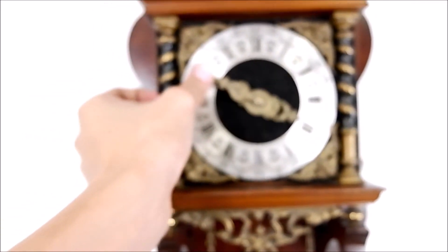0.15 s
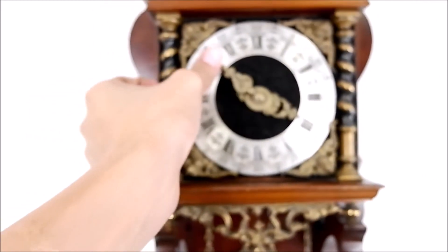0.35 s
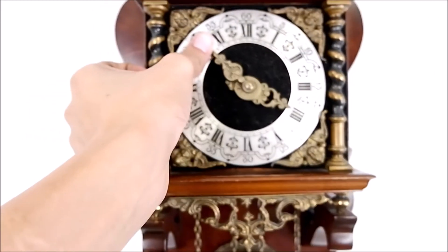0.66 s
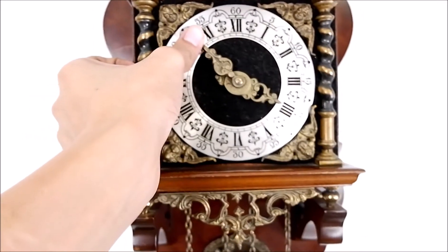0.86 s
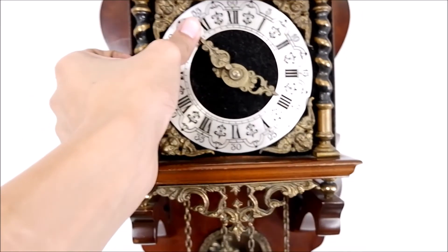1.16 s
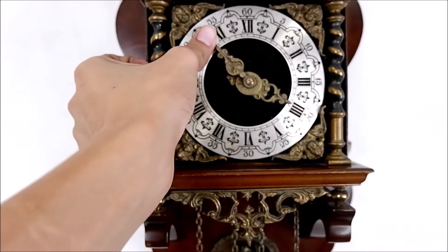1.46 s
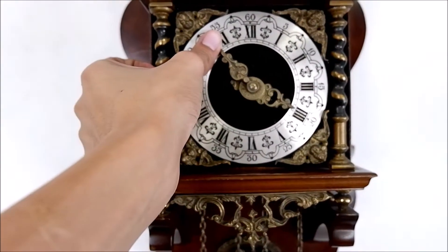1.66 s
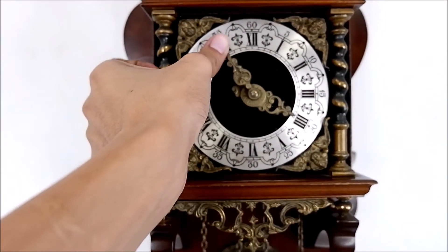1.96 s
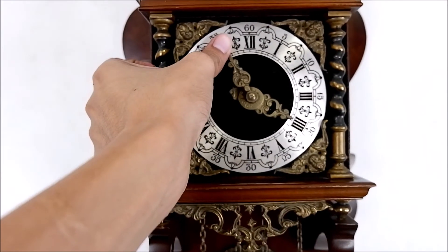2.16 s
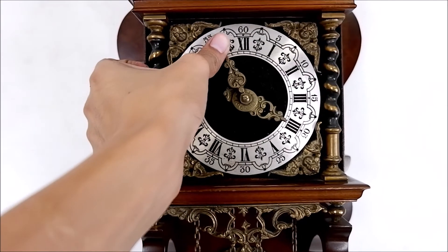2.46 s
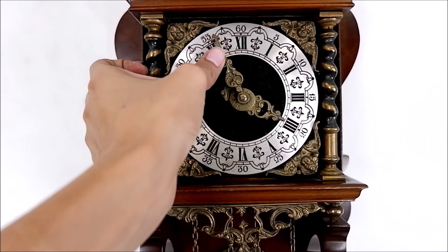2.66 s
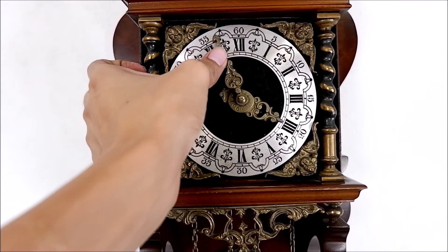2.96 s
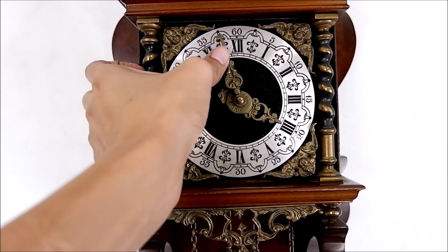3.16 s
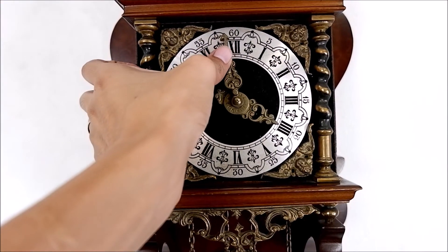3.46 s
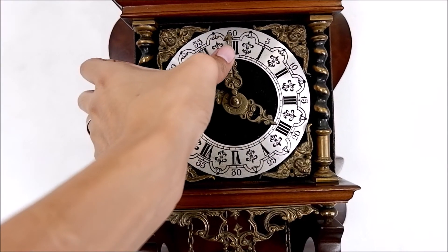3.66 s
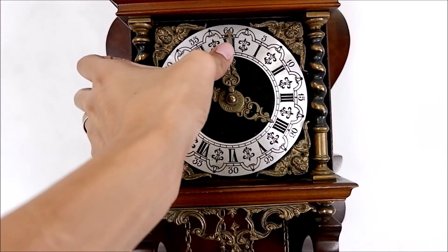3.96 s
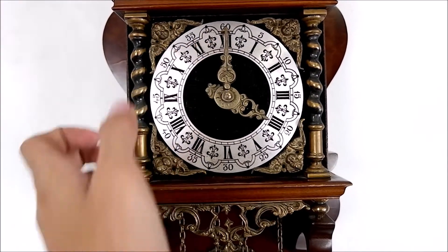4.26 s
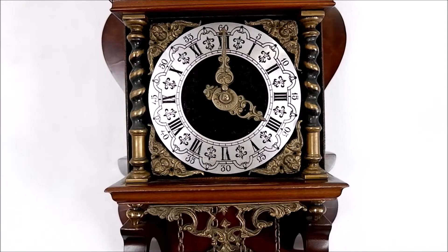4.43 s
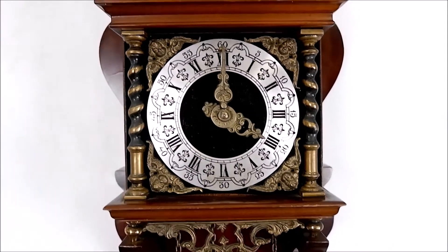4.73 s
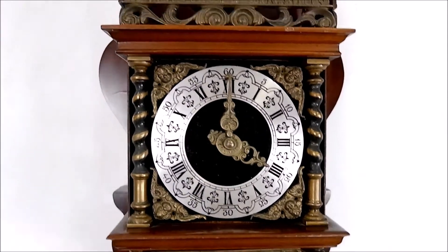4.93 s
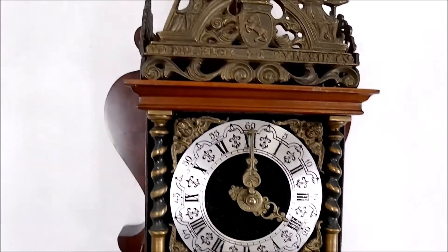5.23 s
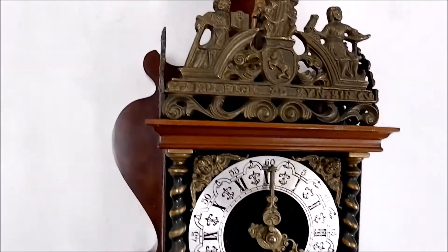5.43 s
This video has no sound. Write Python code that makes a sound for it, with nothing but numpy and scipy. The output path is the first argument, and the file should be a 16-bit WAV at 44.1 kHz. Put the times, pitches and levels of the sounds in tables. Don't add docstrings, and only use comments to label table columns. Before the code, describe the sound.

Close on the microphone, hard plastic snaps and small creaks of fingers gripping the phone fill the first second or so. A wooden clock ticks about twice a second, with faint knocks and scrapes as its hand is pushed. Near four seconds a lever drops, bounces and clinks; then ticks weaken and gears whirr softly. Quiet small room with low hum.

```python
import sys
import numpy as np
from scipy import signal
from scipy.fft import rfft, irfft
from scipy.io import wavfile
from scipy.ndimage import uniform_filter1d

SR = 44100
rng = np.random.default_rng(int(sys.argv[2]) if len(sys.argv) > 2 else 0)


def digitize_waveform(pressure):
    field = np.atleast_2d(pressure).T
    bounded = np.clip(field, -1, 1)
    quanta = np.round(bounded * 32767).astype(np.int16)
    wavfile.write(sys.argv[1], SR, quanta)


def undo_db(level):
    steps = np.asarray(level, float) / 20
    return 10 ** steps


N = 246519
T = np.arange(N) / SR
HZ = np.maximum(np.fft.rfftfreq(N, 1 / SR), 1)

# (frequency [Hz], density [dB per Hz])
AIR_MID = [(25, -36.5), (55, -10.5), (110, -7.5), (200, -3), (290, -7), (430, -9.5), (1000, -13),
           (2500, -16.5), (3500, -19), (4200, -18.5), (5500, -20), (8000, -25), (12000, -28), (15500, -27)]
# (frequency [Hz], side minus mid [dB])
AIR_SIDE = [(60, -5.5), (110, -7), (200, -5), (380, -3.5), (700, -3.5), (1290, -2), (2380, -1.5),
            (4400, 0.5), (8120, -1), (15000, 0)]
# (centre [Hz], width [Hz], level [dB])
HUM = [
    (65, 21, -71),
    (286.2, 33, -65),
    (465, 20, -77.5),
    (1288, 35, -79),
    (4110, 840, -70.5),
]
# (time [s], gain change [dB], recovery [s])
GAIN_MOVES = [
    (.108, -8, 0.31),
    (.712, -13, 0.18),
    (.883, -6.5, 0.56),
    (1.121, -5.5, 0.43),
    (3.885, 2.5, 0.11),
]
# (frequency [Hz], left minus right [dB])
PORT_DB = [(60, 0), (500, 0), (750, -6), (1200, 0), (2800, 0), (3300, -3), (4200, 2), (5200, -5),
           (8000, -5), (16000, -3)]
# (frequency [Hz], left phase lead [rad])
PORT_RAD = [(60, 0), (3700, -.4), (4200, 1.8), (4700, 1.2), (5200, -.4), (6100, 2.5), (6700, 2.1),
            (8500, 2.1), (10000, 2.5), (12500, .3), (16000, 2)]
# (time [s], level [dB], centre [Hz], length [ms])
SHIFTS = [(.01, -56, 1510, 32), (0.054, -49, 393, 3.7), (.32, -54, 2600, 52), (.37, -56, 2370, 55),
          (0.417, -53.5, 2090, 40), (.5, -56.5, 2500, 420), (0.594, -52, 1440, 31), (.65, -57, 242, 10),
          (.725, -50, 1820, 15), (0.886, -48, 146, 7), (.89, -55.5, 1860, 25), (1.121, -53, 204, 8.3),
          (1.127, -58, 2280, 9.4), (.114, -54, 2600, 10), (.14, -62.5, 2400, 70), (.33, -62, 2300, 130)]
# (time [s], level [dB], length [ms])
CREAKS = [
    (0.631, -43, 26),
    (.645, -39.5, 16.4),
    (0.689, -42, 15),
    (.793, -40, 14),
    (0.919, -44, 12),
    (1.078, -49.5, 12),
]
# (centre [Hz], width [octaves], level [dB])
CREAK_BANDS = [
    (2400, 1.2, -8.5),
    (4400, 0.31, -8),
    (7650, .5, -7),
    (12000, 1.2, -15.5),
]
# (time [s], knock level [dB], knock [Hz], crackle level [dB], crackle length [ms])
SNAPS = [(0.098, -27, 2400, -36, 4.4), (0.1027, -29, 2210, -19, 2.9), (0.1072, -10, 2770, -4.5, 3),
         (0.1087, -19, 1850, -21.5, 7.1), (0.1111, -20, 2900, -29, 4.2), (0.711, -5, 2430, 0.5, 0.41),
         (0.7121, -19.5, 1440, -20, 9.7), (0.7159, -24, 2240, -8.5, 7.2), (0.8758, -25.5, 2010, -24, 21),
         (0.883, -17.5, 4530, -22, 1.6), (.8832, -18, 1870, -18, 2.1), (0.882, -20, 1467, -6, 4.7),
         (1.1115, -33, 2800, -40, 11), (1.1185, -24, 1950, -31.5, 2.3), (1.1211, -12, 1730, -6.5, 1.6),
         (1.121, -7, 2755, -19.5, 3.6), (1.1225, -23, 1800, -9.5, 2.5), (1.1254, -18.5, 2900, -23.5, 4.6),
         (1.349, -50, 2200, -36.5, 3.7)]
# (frequency [Hz], density [dB per Hz])
SHELL = [(150, -25), (550, -28.5), (870, -20), (1460, -9), (1900, -4.5), (2700, -7.5), (3700, -19),
         (4400, -0.5), (4850, -7), (5150, -6.5), (6100, -15.5), (7300, -4.5), (8400, -8.5), (12000, -27.5),
         (16500, -43)]
# (time [s], level [dB], centre [Hz], length [ms])
KNOCKS = [
    (2.143, -45, 1210, 13),
    (2.153, -45.5, 746, 22),
    (2.365, -54.5, 990, 21),
    (3.098, -49, 1300, 14),
    (3.1, -46.5, 430, 27),
    (3.139, -59, 1180, 40),
    (4.399, -53, 880, 14),
    (4.73, -52.5, 1170, 52),
    (5.447, -54, 270, 7.8),
]
# (time [s], level [dB], centre [Hz], length [ms])
SCRAPES = [(1.471, -51, 1800, 22), (2.528, -53.5, 1100, 9.6), (2.98, -59, 1400, 39),
           (2.152, -49.5, 3520, 9), (2.0, -54, 900, 17), (2.945, -56, 930, 11), (3.1, -54, 2480, 6.1),
           (3.15, -60, 470, 30), (3.31, -59.5, 2000, 15), (3.55, -58, 1500, 14), (3.71, -58, 2700, 15),
           (4.14, -58, 1800, 25), (4.285, -58, 2420, 17), (5.33, -52, 2220, 33), (5.45, -56.5, 2260, 17)]
# (frequency [Hz], level [dB], T60 [s])
CASE = [(1283.6, 8.5, 0.082), (1397, -7.5, 0.15), (2090, -7.5, 0.045), (2366, -9, 0.085),
        (2557, -8.5, 0.064), (2658, 2.5, 0.038), (2900, -21, 0.022), (3210, -27, 0.0087), (3920, -18, .02),
        (1800, -17, .03)]
# (time [s], peak [dB], upper modes [dB])
TICKS = [(0.0762, -42, 4.5), (0.5445, -37.5, -0.5), (1.035, -41, -3.5), (1.505, -39, -5.5),
         (1.986, -39.5, 1.5), (2.4507, -38, 0), (2.9427, -36, -0.5), (3.139, -49, 2), (3.41, -37, -2.5),
         (3.886, -31, -6), (4.3749, -43, -2), (4.8549, -44.5, 3), (4.878, -50, -10), (5.3138, -49, 0)]
# (time [s], first bounce [dB], bouncing lasts [s])
DROPS = [
    (3.8812, -24, 0.032),
    (3.935, -32.5, .056),
]
# (frequency [Hz], level [dB], T60 [s])
FRAME = [(470, -9.5, 0.22), (644, -5.5, 0.17), (722.4, -7, 0.15), (870, 0, .07), (994, -1.5, 0.058),
         (1076, -0.5, 0.086), (1290, -5.5, 0.096), (1470, 5, 0.028), (1688, -3.5, 0.079),
         (2140, 2.5, 0.038), (2420, 6, 0.024), (2600, -9, 0.026), (2930, -6, 0.1)]
# (time [s], peak [dB])
CLINKS = [(3.882, -38), (3.89, -29), (3.897, -35), (3.903, -38), (3.914, -43), (3.925, -40), (3.936, -34.5),
          (3.941, -41), (3.959, -40), (3.966, -43), (3.95, -40), (3.98, -46)]
# (frequency [Hz], level [dB], T60 [s])
STEEL = [(4000, -4, .03), (4600, -6, .03), (5400, -2, .03), (6200, 0, .035), (6900, -3, .035),
         (7300, -4, .035), (8100, -2, .035), (8600, -2, .035)]

AIR_TOP_HZ, HUSH_DB, BASS_DB = 15900, -62.5, 3.5
ROOM_T60_S, ROOM_DB = 0.1, -24.5
SHIFT_OCT, KNOCK_OCT, SCRAPE_OCT = 0.83, 1.9, 0.93
SNAP_TOP_HZ, KNOCK_T60_S = 16600, 0.0065
TILT_DB_PER_OCT, TILT_PER_DB = 6, 0.66
TRAIN_S, TRAIN_RUN_UP_S, TRAIN_DB, TRAIN_DB_PER_S = 4.54, 0.35, -64, 3.5
TICK_PUSH_MS, TICK_RISE_S = 5.8, 0.005
LOCK_S, LOCK_DB = 0.017, -8
BOUNCE_S, BOUNCE_GROWTH, BOUNCE_FADE_DB_PER_S = 0.0045, 1.16, -170
CONTACT_MS, FIRST_CONTACT_MS = 4.3, 1.7
CEILING = 0.62


def along_hz(table):
    f, v = np.transpose(table)
    return np.interp(np.log(HZ), np.log(np.maximum(f, 1)), v)


def shaped(x, gain):
    return irfft(rfft(x) * gain, N)


def unit(x):
    return x / np.sqrt(np.mean(x ** 2))


def add(out, s, x, db):
    i = max(int(s * SR), 0)
    x = x[:N - i]
    out[i:i + len(x)] += x * undo_db(db) / np.max(np.abs(x))


def decay(t, t60):
    return np.exp(-np.log(1000) * t / t60)


def walk(rate_hz):
    band = np.exp(-(HZ / rate_hz) ** 2) * (HZ > 1.1 * SR / N)
    return unit(shaped(rng.standard_normal(N), band))


def gain_db():
    total = np.zeros(N)
    for s, db, recovery_s in GAIN_MOVES:
        attack = np.clip((T - s) / 0.0028 + 1, 0, 1)
        total += db * attack * np.exp(-(np.maximum(T - s, 0) / recovery_s) ** 2.15)
    return total


def hush():
    mid_gain = undo_db(along_hz(AIR_MID)) * (HZ < AIR_TOP_HZ)
    mid = shaped(rng.standard_normal(N), mid_gain)
    side = shaped(rng.standard_normal(N), mid_gain * undo_db(along_hz(AIR_SIDE)))
    hiss_band = (HZ > 3500) & (HZ < 12000)
    air = np.array([mid + side, mid - side]) / np.sqrt(np.mean(shaped(mid, hiss_band) ** 2))
    low = shaped(air, 1 / (1 + (HZ / 900) ** 2))
    drone = np.zeros(N)
    for f, width, db in HUM:
        resonance = 1 / (1 + (2 * (HZ - f) / width) ** 2)
        drone += undo_db(db + 61) * unit(shaped(rng.standard_normal(N), resonance))
    swell = undo_db(BASS_DB + 0.8 * walk(6))
    return undo_db(HUSH_DB + gain_db()) * (air - low + swell * (low + drone))


def rubs(rows, octaves):
    out, t = np.zeros(N), np.arange(4096) / SR
    f = np.maximum(np.fft.rfftfreq(4096, 1 / SR), 1)
    for s, db, hz, ms in rows:
        grit = rng.standard_normal(4096) * undo_db(3.66 * rng.exponential(size=4096))
        grit = irfft(rfft(grit) * np.exp(-2 * (np.log2(f / hz) / octaves) ** 2))
        envelope = (1 - np.exp(-t / 0.003)) * np.exp(-(t * 1000 / ms) ** 2)
        add(out, s, grit * envelope, db + 11)
    return out


def creaks():
    out = np.zeros(N)
    for hz, octaves, band_db in CREAK_BANDS:
        out += rubs([(s, db + band_db, hz, ms) for s, db, ms in CREAKS], octaves)
    return out


def snaps():
    out, t = np.zeros(N), np.arange(1024) / SR - 0.002
    f = np.maximum(np.fft.rfftfreq(1024, 1 / SR), 1)
    shell_hz, shell_db = np.transpose(SHELL)
    colour = np.interp(np.log(f), np.log(shell_hz), shell_db)
    treble = 1 / (1 + (3600 / f) ** 8)
    highpass = signal.butter(2, 900, "high", fs=SR, output="sos")
    for s, knock_db, hz, crackle_db, ms in SNAPS:
        knock = np.sin(2 * np.pi * hz * t) * decay(t, KNOCK_T60_S) * np.clip(t * hz, 0, 1)
        add(out, s + t[0], signal.sosfilt(highpass, knock), knock_db)

        fade = np.exp(-t * 2300 / ms) * (t > 0)
        grit = rng.standard_normal(1024) * fade
        parts = rfft(grit) * (1 - treble) + rfft(grit * fade ** 1.25) * treble
        parts /= np.sqrt(uniform_filter1d(np.abs(parts) ** 2, size=15))
        tilt = TILT_DB_PER_OCT + TILT_PER_DB * crackle_db
        colour_gain = undo_db(colour + tilt * np.log2(np.maximum(f / 2500, 1)))
        crackle = irfft(parts * (f > 100) * (f < SNAP_TOP_HZ) * colour_gain)
        gate = np.exp(-(t * 1000 / (1.15 * ms + 1.3)) ** 4)
        add(out, s + t[0], gate * crackle, crackle_db)
    return out


def train():
    teeth = rng.standard_normal(N) * undo_db(2.5 * rng.exponential(size=N) + 2.5 * walk(12))
    modes = sum(undo_db(db) / np.sqrt(1 + (HZ - f) ** 2 * t60 ** 2) for f, db, t60 in CASE)
    broad = undo_db(-4) * np.exp(-2 * (np.log2(HZ / 1500) / 1.6) ** 2)
    run_up = np.clip((T - TRAIN_S) / TRAIN_RUN_UP_S, 0, 1)
    return unit(shaped(teeth, modes + broad)) * run_up * undo_db(TRAIN_DB + TRAIN_DB_PER_S * (T - TRAIN_S))


def ring(modes, length_ms, scatter_db, rattle_db, size=8192):
    t = np.arange(size) / SR
    push = rng.standard_normal(size) * t * np.exp(-t * 5000 / max(length_ms, 0.2))
    push /= np.sqrt(np.sum(push ** 2))
    f, db, t60 = np.transpose(modes)[:, :, None]
    level_chance, pitch_chance = rng.standard_normal((2, len(modes), 1))
    f = f * (1 + 0.003 * pitch_chance)
    reach = np.abs(np.exp(2j * np.pi * f * t[:1024]) @ push[:1024])
    reach = np.maximum(reach, 0.3)[:, None]
    body = undo_db(db + scatter_db * level_chance) / reach * decay(t, t60) * np.sin(2 * np.pi * f * t)
    rattle = undo_db(rattle_db) * rng.standard_normal(size) * decay(t, np.median(t60))
    band = signal.butter(4, [0.85 * f.min(), 1.1 * f.max()], "band", fs=SR, output="sos")
    return signal.sosfilt(band, signal.fftconvolve(push, body.sum(axis=0) + rattle)[:size])


def ticks():
    out, rise = np.zeros(N), 1 - np.exp(-(T[:8192] / TICK_RISE_S) ** 2)
    for s, db, upper_db in TICKS:
        for late, less_db in ((0, 0), (LOCK_S, LOCK_DB)):
            lower = rise * ring(CASE[:2], TICK_PUSH_MS, 1.9, 2.5)
            upper = rise * ring(CASE[2:], 1.4 * TICK_PUSH_MS, 3, 5)
            add(out, s + late, lower, db + less_db)
            add(out, s + late, upper, db + upper_db + less_db)
    return out


def lever():
    out = np.zeros(N)
    waits = np.cumsum(np.r_[0, BOUNCE_S * BOUNCE_GROWTH ** np.arange(7)])
    for s, first_db, last_s in DROPS:
        for k, wait in enumerate(waits):
            db = first_db + BOUNCE_FADE_DB_PER_S * wait - 2000 * max(wait - last_s, 0)
            add(out, s + wait, ring(FRAME, CONTACT_MS if k else FIRST_CONTACT_MS, 1.6, 4.7), db)
    for s, db in CLINKS:
        add(out, s, ring(STEEL, CONTACT_MS, 3.5, 5), db)
    return out


def room(x):
    t = T[:SR // 2]
    tail = rng.standard_normal((2, len(t))) * decay(t, ROOM_T60_S) * (t > 0.002)
    tail /= np.sqrt(np.sum(tail[0] ** 2))
    return undo_db(ROOM_DB + 7.5) * signal.fftconvolve(x[None], tail, axes=1)[:, :N]


def through_shell(grip):
    port = undo_db(along_hz(PORT_DB) / 2) * np.exp(0.5j * along_hz(PORT_RAD))
    return np.array([shaped(grip, port), shaped(grip, 1 / port)])


def scene():
    grip = rubs(SHIFTS, SHIFT_OCT) + creaks() + snaps()
    works = rubs(KNOCKS, KNOCK_OCT) + rubs(SCRAPES, SCRAPE_OCT)
    clock = works + train() + ticks() + lever()
    return hush() + through_shell(grip) + clock + room(clock)


def low_pass(x):
    return signal.sosfilt(signal.butter(12, 16970, fs=SR, output="sos"), x)


def record(dry):
    return low_pass(CEILING * np.tanh(dry / CEILING))


dry = scene()
out = record(dry)
digitize_waveform(out)
```